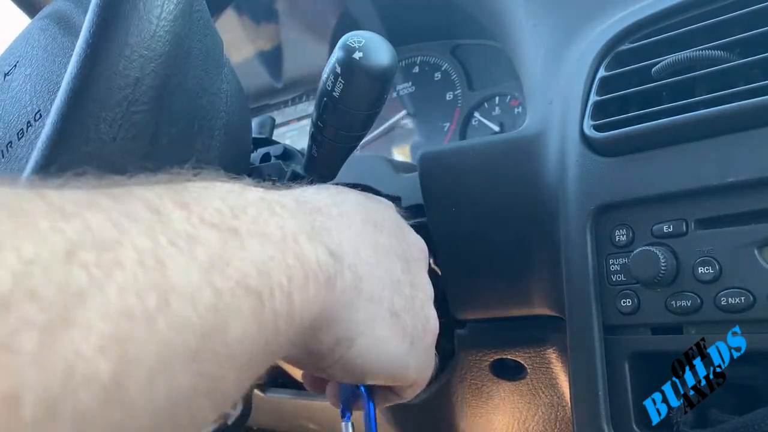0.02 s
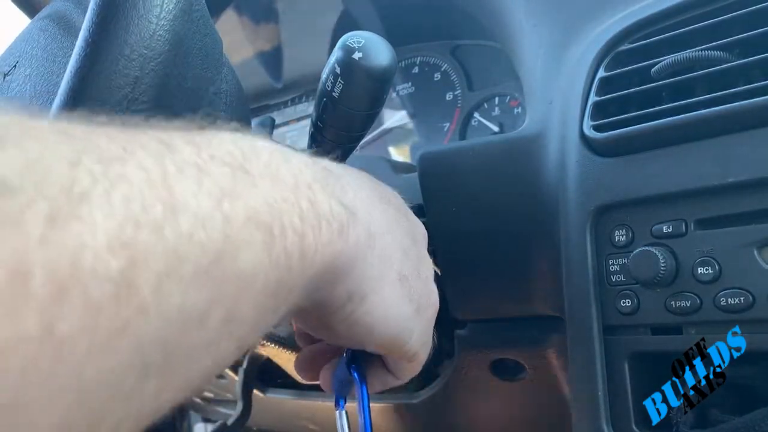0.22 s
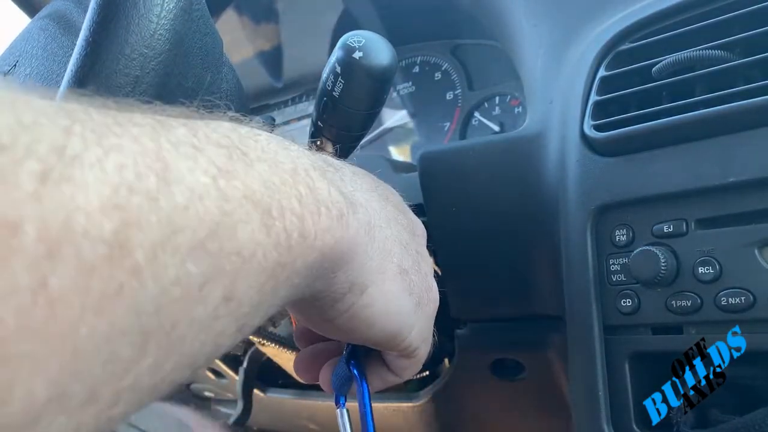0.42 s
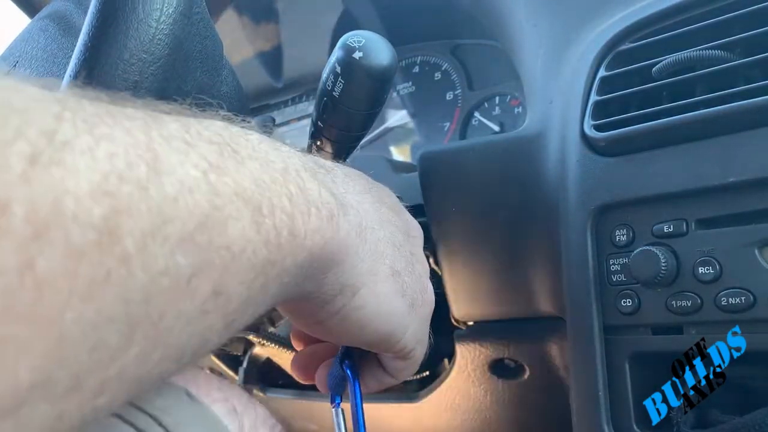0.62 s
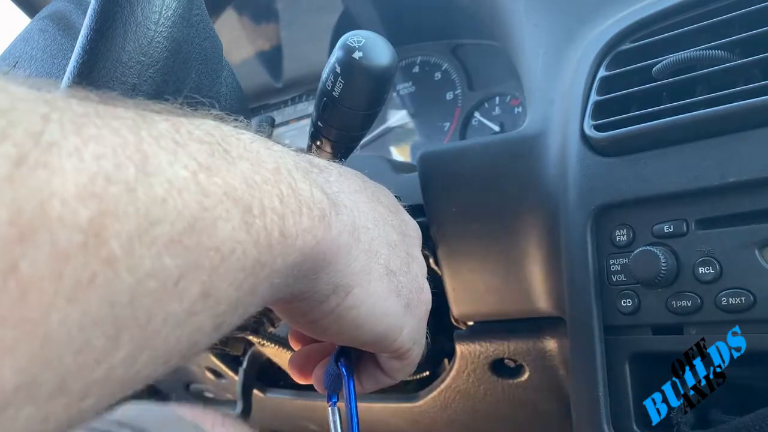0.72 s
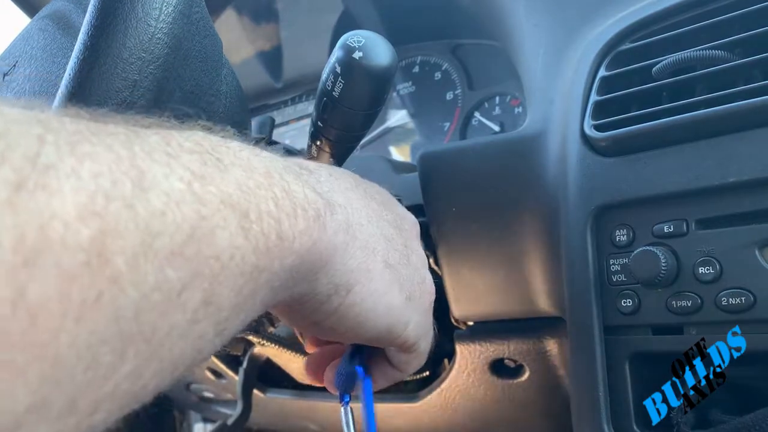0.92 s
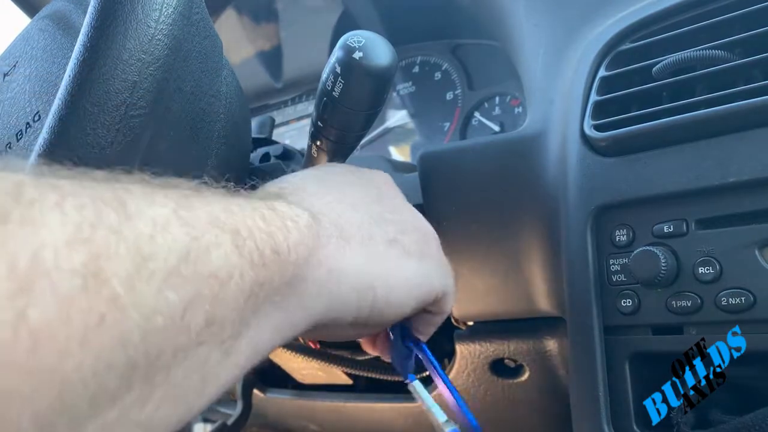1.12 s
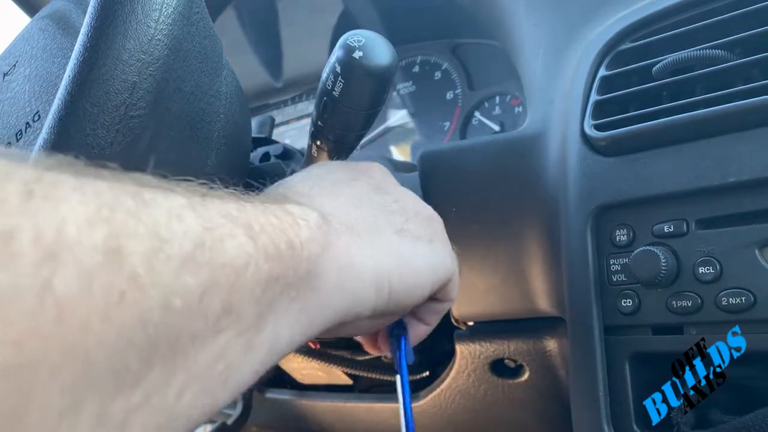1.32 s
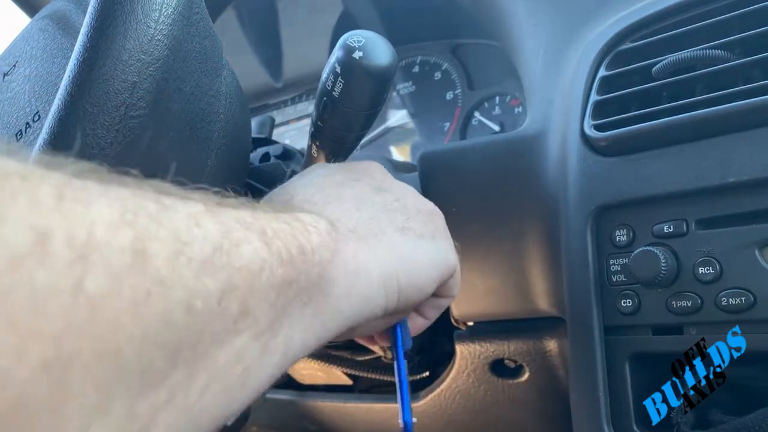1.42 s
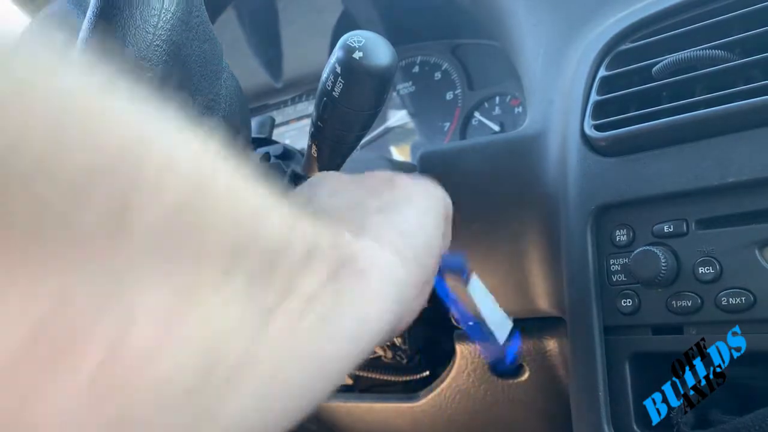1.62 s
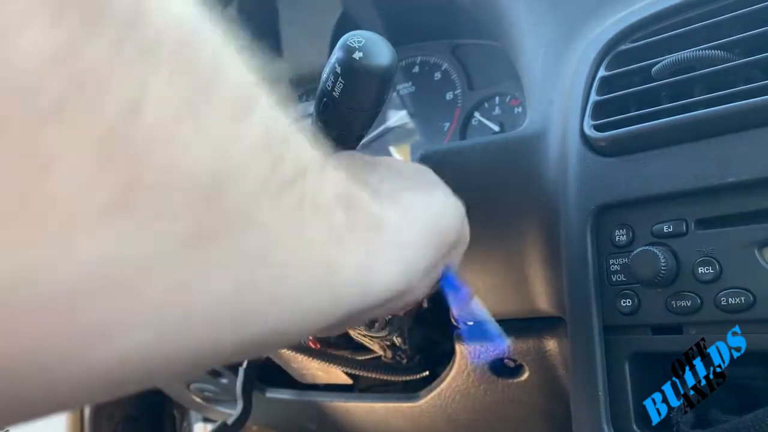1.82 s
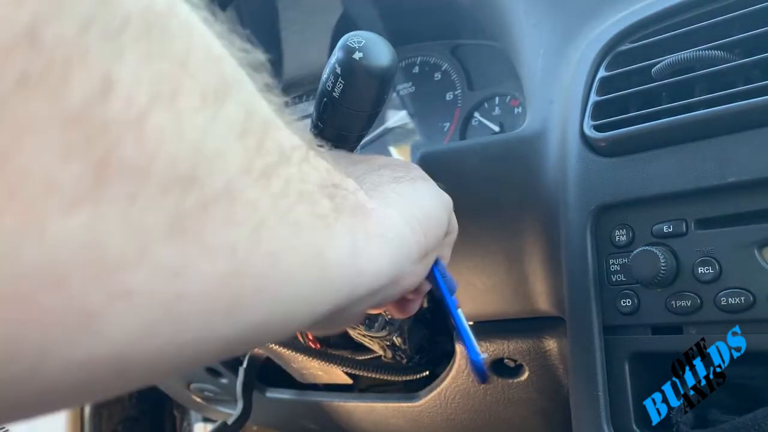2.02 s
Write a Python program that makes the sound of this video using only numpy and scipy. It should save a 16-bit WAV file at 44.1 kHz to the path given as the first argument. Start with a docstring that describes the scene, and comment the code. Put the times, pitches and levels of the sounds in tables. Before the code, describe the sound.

A key jiggles in a worn car ignition lock: hard knocks and a click first, a low thump and brief metallic rasp, then sharp clicks and a clip chinking, heard close in a small, dry cabin.

```python
"""Skin and sleeve rustle over a low rumble as a hand jiggles and turns a key inside a parked car.
The steering column knocks as ringing modes, and the worn lock clicks as short noise bursts with dull taps.
The sliding key rasps in tiny ringing slips; its blade and a metal clip chink as dying sines.
Rustle and rumble are patchy noise, and sparse reflections give the struck sounds a short cabin tail.
Two microphones close by pick it all up."""
import sys
import numpy as np
from scipy import signal
from scipy.fft import rfft, irfft, next_fast_len
from scipy.io import wavfile
from scipy.ndimage import uniform_filter1d

SR = 44100
rng = np.random.default_rng(int(sys.argv[2]) if len(sys.argv) > 2 else 0)


def put_to_file(sound):
    """Save the sound as 16-bit audio at rate SR, in the file named by the first command-line argument."""
    columns = np.atleast_2d(sound).T  # one column per channel
    safe = np.clip(columns, -1, 1)
    whole_steps = np.round(safe * 32767)
    wavfile.write(sys.argv[1], SR, whole_steps.astype(np.int16))


N = 90405
TIME_S = np.arange(N) / SR


def gain_of(db):
    """Amplitude factor of a level in dB."""
    return 10 ** (np.asarray(db) / 20)


def evened(x):
    """Scale to an RMS of one."""
    return x / np.sqrt(np.mean(x ** 2) + 1e-20)


def read(points, hz):
    """Read a curve of (frequency, value) points along a logarithmic frequency axis."""
    f, value = np.transpose(points)
    return np.interp(np.log(hz + 1), np.log(f + 1), value)


def banded(points, hz, skirt_db=30):
    """Gain of a spectrum that falls by skirt_db per octave beyond both ends."""
    octaves = np.log2(hz + 1)
    below = np.maximum(np.log2(points[0][0]) - octaves, 0)
    above = np.maximum(octaves - np.log2(points[-1][0]), 0)
    return gain_of(read(points, hz) - skirt_db * (below + above))


def add(mix, start_s, sound):
    """Lay a sound into the mix, cut off at the end of the mix."""
    part = mix[round(start_s * SR):][:len(sound)]
    part += sound[:len(part)]


def ring(modes, extra_db, rise_cycles):
    """Dying sines, one per mode (Hz, dB, t60 s), each swelling over its first cycles."""
    t = np.arange(SR // 3) / SR
    hz, db, t60 = np.transpose(modes)[:, :, None]
    swell = np.minimum(t * hz / rise_cycles, 1)
    decay = gain_of(db + extra_db - 60 * t / t60)
    return (swell * decay * np.sin(2 * np.pi * hz * t)).sum(0)


def rustle(spectrum, level_db, size, patchy_db, flicker_db):
    """Stereo noise, patchy across time and pitch and flickering as a whole, that follows level_db."""
    # likeness of left and right: (frequency [Hz], correlation)
    likeness = [(150, 0.91), (800, 0.1), (5000, 0.022), (7000, 1)]
    frames, hz = 4 * N // size + 5, np.fft.rfftfreq(size, 1 / SR)
    a, b, c, d, patches = rng.standard_normal((frames, len(hz), 5)).T
    patches = uniform_filter1d(patches, size=5, axis=0)  # over neighbouring frequencies
    patches = evened(uniform_filter1d(patches, size=24, axis=1))  # over successive frames
    flicker = evened(uniform_filter1d(rng.standard_normal(frames), size=3))
    same = np.clip(read(likeness, hz), -1, 1)[:, None]
    left = a + 1j * b
    right = same * left + np.sqrt(1 - same ** 2) * (c + 1j * d)
    unevenness = gain_of(patchy_db * patches + flicker_db * flicker)
    spectra = np.array([left, right]) * banded(spectrum, hz)[:, None] * unevenness
    noise = signal.istft(spectra, nperseg=size, noverlap=size * 3 // 4)[1][:, :N]
    return gain_of(level_db) * evened(noise)


def hand_and_sleeve(treble_db, middle_db):
    """Rubbing skin and cloth: a treble and a middle band of noise, each with its own level curve."""
    # colour of the fine hiss: (frequency [Hz], relative level [dB])
    treble = [(1800, 3), (3800, 2), (6100, -5), (12500, -5.5), (15300, -13)]
    # colour of the fuller rub: (frequency [Hz], relative level [dB])
    middle = [(250, 4), (800, -3.5), (1400, -10), (2200, -20)]
    return (rustle(treble, treble_db, size=512, patchy_db=2.0, flicker_db=1.77)
            + rustle(middle, middle_db, size=512, patchy_db=2.5, flicker_db=2.5))


def cabin_rumble(middle_db):
    """Low noise that swells by a third of a dB for each dB of the middle rub."""
    # colour of the rumble: (frequency [Hz], relative level [dB])
    bass = [(30, -4.5), (78, -1), (150, -11), (330, -24.5)]
    level_db = -44.5 + 0.33 * (middle_db + 59)  # -44.5 dB when the middle rub is at -59 dB
    return rustle(bass, level_db, size=2048, patchy_db=3.5, flicker_db=1.1)


def column_knocks():
    """Each blow rings the steering column's modes, most those near the pitch it favours."""
    # blows: (time [s], level [dB], favoured pitch [Hz])
    blows = [(0.19, -22, 146), (0.217, -17, 632), (0.2232, -9, 183), (0.264, -19, 137), (0.322, -38, 440),
             (0.446, -30, 74.6), (0.501, -35, 290), (0.609, -39.5, 580), (0.829, -30, 238),
             (0.843, -17.5, 63), (0.876, -11.5, 64), (0.925, -19.5, 73), (1.045, -26.5, 326),
             (1.386, -27, 482), (1.394, -25.5, 91), (1.8952, -30, 337), (1.919, -31.5, 81)]
    # modes of the column: (frequency [Hz], level [dB], t60 [s])
    column = [(75.1, 5, 0.16), (113.1, 7, 0.08), (149.6, 6, 0.079), (214.6, 8, 0.071), (331, -1, 0.084),
              (395.9, 2.5, 0.11), (556, 3.5, 0.032), (684, -1.5, 0.063), (946, 4, 0.032),
              (1305, 6.5, 0.019)]
    blow_db_per_octave, rise_cycles = 11.5, 0.788
    out, hz = np.zeros(N), np.array(column)[:, :1]
    for s, db, pitch_hz in blows:
        favour_db = -blow_db_per_octave * abs(np.log2(hz / pitch_hz))
        add(out, s, ring(column, db + favour_db, rise_cycles))
    return out


def lock_clicks():
    """Short rattling bursts of metal, each with a duller tap of the plastic around the lock."""
    # clicks: (time [s], metal level [dB], plastic level [dB], metal tilt about 6 kHz [dB per octave])
    events = [(0.2193, -22.5, -28.5, 4), (0.2514, -35.5, -46, 9.5), (0.8225, -48, -50.5, 5.5),
              (0.8327, -39.5, -35.5, -4), (0.8643, -46, -44, 12), (0.889, -63, -36.5, -10),
              (1.1116, -39.5, -65, 16), (1.172, -41, -50, -10), (1.2579, -40.5, -74, -3),
              (1.3791, -29, -37.5, -4), (1.3851, -31, -36, -6.5), (1.442, -40, -70, -13),
              (1.4571, -25, -43, 0.5), (1.4962, -40.5, -68, -3), (1.5215, -34.5, -62, -3.5),
              (1.6118, -46.5, -57, 5.5), (1.6684, -46, -77, -1), (1.6874, -32, -43, -2),
              (1.721, -43, -55.5, -0.5), (1.8528, -46.5, -40, 1), (1.8662, -30, -48, 7.5),
              (1.8799, -21.5, -33.5, 6), (1.8901, -32, -35, -18), (1.9694, -48.5, -66, 3)]
    # colour of the metal: (frequency [Hz], relative level [dB])
    metal = [(1800, 1), (3600, -3), (7300, -6.5), (10000, -6), (15500, -19.5)]
    # resonances of the plastic: [Hz]
    plastic = (1188, 1428)
    plastic_width_hz, plastic_t60_s, metal_t60_s = 230, 0.059, 0.025
    rattle_db, ringy_db = 3, 2  # unevenness of each burst in time, and of its spectrum
    size = 4096
    out, t, hz = np.zeros(N), np.arange(size) / SR, np.fft.rfftfreq(size, 1 / SR)
    dull = sum(1 / (1 + ((hz - f) / plastic_width_hz) ** 2) for f in plastic)
    for s, metal_db, plastic_db, tilt_db in events:
        metal_noise, plastic_noise, rattle, ripple = rng.standard_normal((4, size))
        ripple = evened(uniform_filter1d(ripple, size=30))[:len(hz)]
        colour = banded(metal, hz) * gain_of(tilt_db * np.log2((hz + 1) / 6000) + ringy_db * ripple)
        rattle = gain_of(rattle_db * evened(uniform_filter1d(rattle, size=40)))
        bright = evened(evened(irfft(rfft(metal_noise) * colour)) * rattle)
        bright = bright * gain_of(metal_db - 60 * t / metal_t60_s)
        tap = evened(irfft(rfft(plastic_noise) * dull)) * gain_of(plastic_db - 60 * t / plastic_t60_s)
        # the metal swells in over 2.7 ms, the plastic over 1.5 ms
        add(out, s, np.minimum(t / 0.0027, 1) ** 2 * bright + np.minimum(t / 0.0015, 1) * tap)
    return out


def key_rasp():
    """The blade slips over the pins in tiny uneven jerks, each ringing one of its modes."""
    # modes of the sliding key: [Hz]
    blade = (2580, 3200, 3820, 6080)
    # the key starts, slides fully, slows, stops: [s]
    slide_s = (.88, .98, 1.09, 1.152)
    t60_s, level_db, slips_per_s = 0.04, -56, 600  # slips are counted per mode
    shape = (len(blade), N)
    slips = (rng.random(shape) < slips_per_s / SR) * rng.standard_normal(shape) ** 3
    t = np.arange(2048) / SR
    rings = gain_of(-60 * t / t60_s) * np.sin(2 * np.pi * np.array(blade)[:, None] * t)
    sound = evened(signal.oaconvolve(slips, rings, axes=1)[:, :N].sum(0))
    return gain_of(level_db) * np.interp(TIME_S, slide_s, [0, 1, 1, 0]) * sound


def blade_pings():
    """Lone rings of the key blade, one slowly swelling sine each."""
    # pings: (time [s], frequency [Hz], level [dB], t60 [s])
    pings = [(1.108, 1145, -46, 0.18), (1.3862, 2775, -32, 0.088)]
    out = np.zeros(N)
    for s, *mode in pings:
        add(out, s, ring([mode], 0, rise_cycles=5.5))
    return out


def clip_chinks():
    """The struck clip rings its modes, duller when struck softer, until the fingers damp it."""
    # chinks: (time [s], level [dB])
    strikes = [(1.444, -47.5), (1.4595, -26), (1.4985, -39.5), (1.5213, -36.5), (1.5527, -38)]
    clip = [(1196, -19, 0.34), (1976, -15.5, 0.11), (3531, 1, 0.077), (3780, 1, 0.039), (6300, -0.5, 0.022)]
    soft_dulling = 0.83  # dB per octave above the third mode, for each dB below the hardest chink
    caught_s, damping_db_per_s = 1.575, 900
    out = np.zeros(N)
    octaves_up = np.maximum(np.log2(np.array(clip)[:, :1] / clip[2][0]), 0)
    hardest_db = max(db for _, db in strikes)
    for s, db in strikes:
        dulling_db = soft_dulling * (hardest_db - db) * octaves_up
        add(out, s, ring(clip, db - dulling_db, rise_cycles=10.0))
    return out * gain_of(-damping_db_per_s * np.maximum(TIME_S - caught_s, 0))


def cabin(x):
    """Short tail of sparse random reflections without bass, different at each side."""
    t60_s, low_cut_hz = 0.07, 420
    t = np.arange(SR // 4) / SR
    signs = rng.choice([-1., 1.], (2, len(t)))
    sparse = rng.random((2, len(t))) < 0.05
    taps = signs * sparse * gain_of(-60 * t / t60_s) * (t > 0.002)  # none in the first 2 ms
    taps[1] -= 0.35 * taps[0]  # the right side partly opposes the left
    taps = signal.sosfilt(signal.butter(2, low_cut_hz, "high", fs=SR, output="sos"), taps)
    return signal.fftconvolve(x[None], taps / np.linalg.norm(taps[0]), axes=1)[:, :N]


def scene():
    """Rubbing and rumble around the struck and scraped sounds with their cabin tail."""
    # hand and sleeve rubbing: (time [s], treble level [dB], middle level [dB])
    rubbing = [(0, -74.5, -55.5), (.1, -62, -51), (.35, -57.5, -54), (.53, -62, -49), (0.62, -63.5, -51),
               (.67, -73.5, -60.5), (0.818, -71.5, -66.5), (0.867, -52, -41.5), (.94, -46.5, -54.5),
               (1.098, -55, -45.5), (1.2, -76.5, -56.5), (1.554, -58, -53), (1.593, -69, -69),
               (1.65, -64, -50.5), (1.78, -73, -57.5), (2.05, -73.5, -60)]
    s, treble_db, middle_db = np.transpose(rubbing)
    treble_db, middle_db = (np.interp(TIME_S, s, db) for db in (treble_db, middle_db))
    rub = hand_and_sleeve(treble_db, middle_db) + cabin_rumble(middle_db)
    hits = column_knocks() + lock_clicks()
    metal = key_rasp() + blade_pings() + clip_chinks()
    tail = gain_of(-0.5) * cabin(hits + metal / 2)
    return rub + hits + metal + tail


def record(dry):
    """The two microphones differ in level and lose the deepest bass; then the band limit."""
    # balance of the microphones: (frequency [Hz], left minus right [dB])
    lean = [(60, -2), (300, 2), (1500, 3.5), (4500, -0.5)]
    low_cut_hz, edge_hz = 50.3, 16200
    size = next_fast_len(N + 4096)
    half = gain_of(read(lean, np.fft.rfftfreq(size, 1 / SR)) / 2)  # each side takes half the difference
    ports = irfft(rfft(dry, size) * np.array([half, 1 / half]), size)[:, :N]
    ports = signal.sosfilt(signal.butter(2, low_cut_hz, "high", fs=SR, output="sos"), ports)
    band_limit = signal.firwin(255, edge_hz, window=("kaiser", 9), fs=SR)
    return signal.oaconvolve(ports, band_limit[None], "same")


dry = scene()
out = record(dry)
put_to_file(out)
```